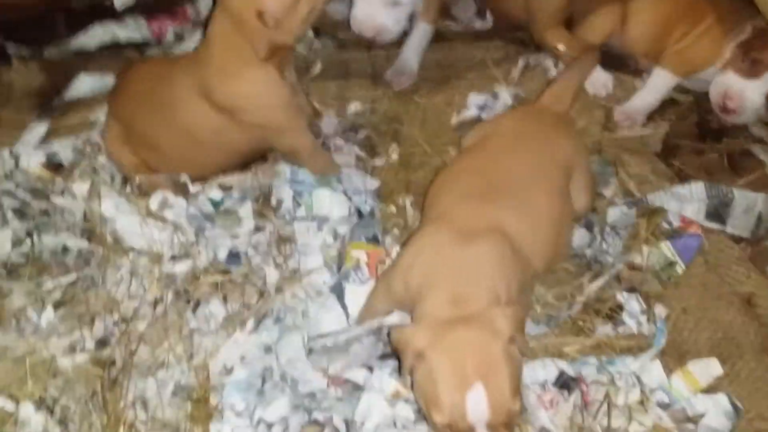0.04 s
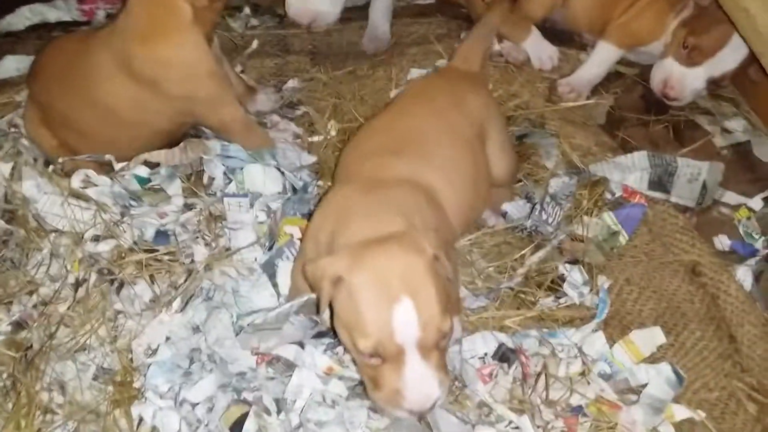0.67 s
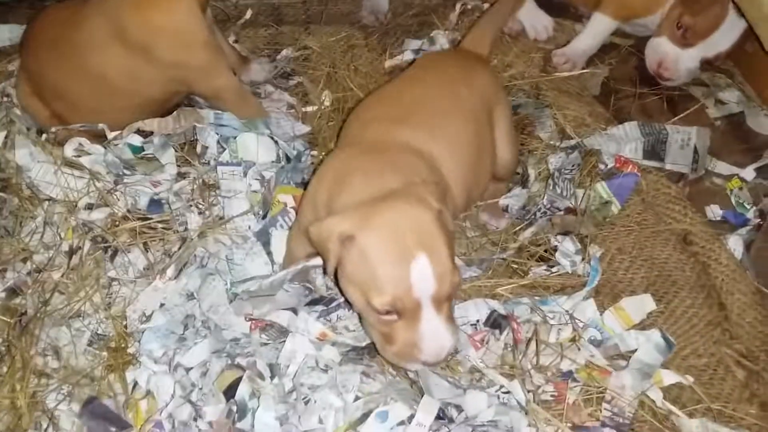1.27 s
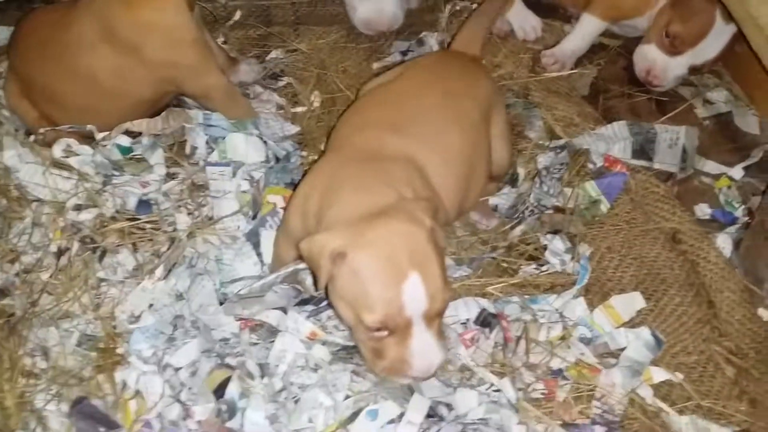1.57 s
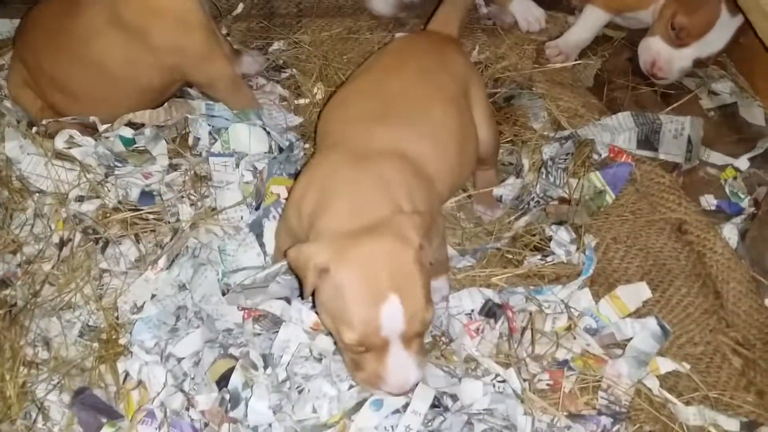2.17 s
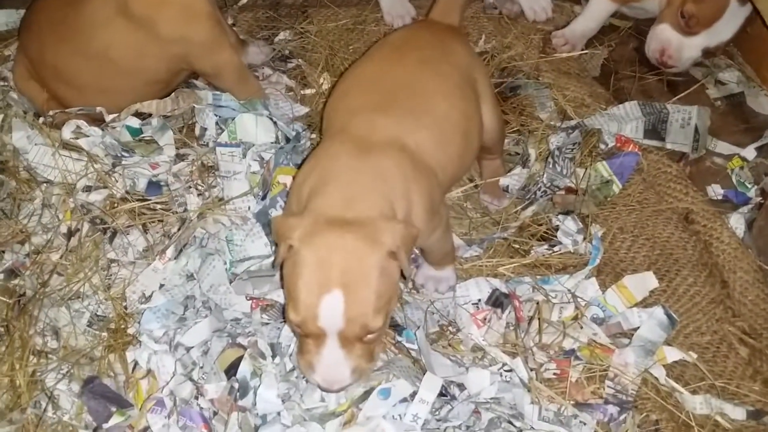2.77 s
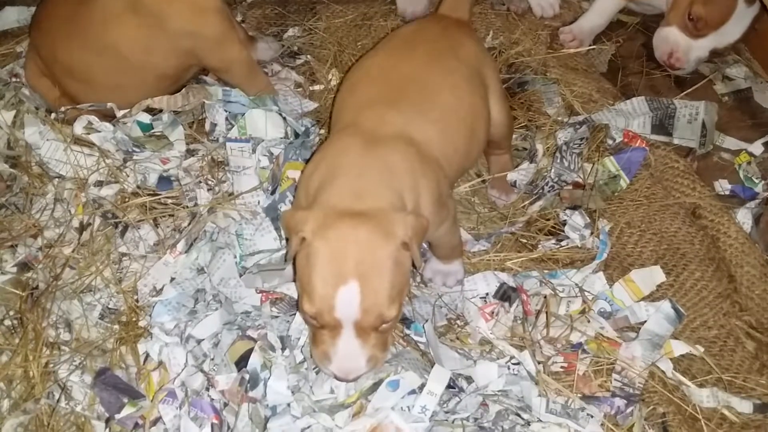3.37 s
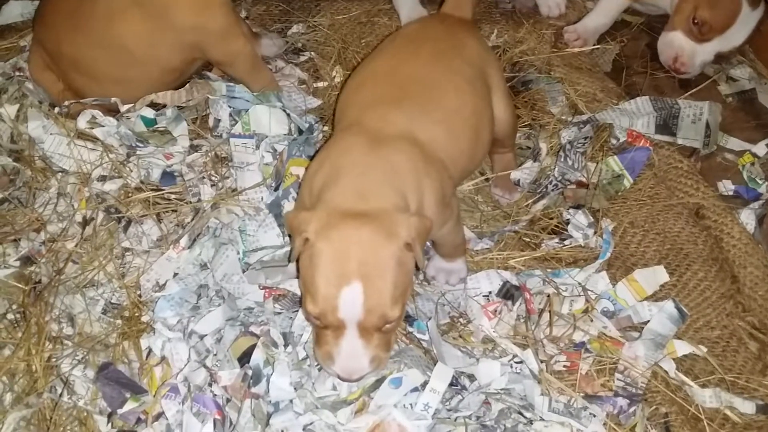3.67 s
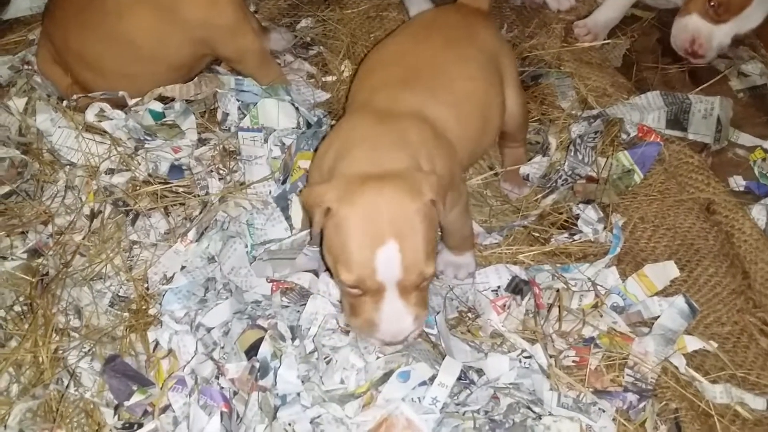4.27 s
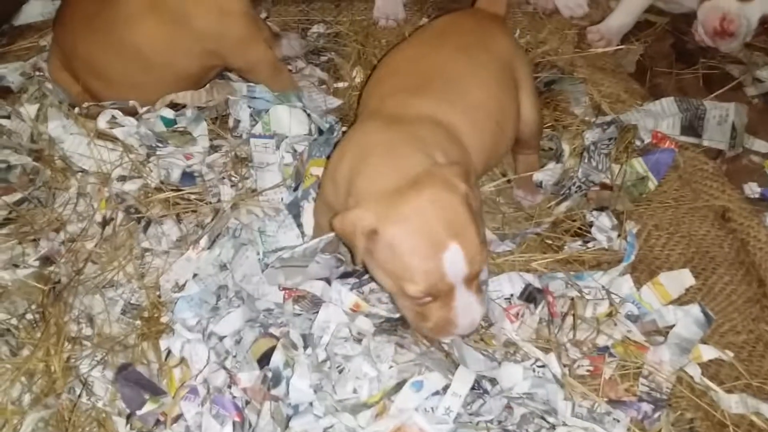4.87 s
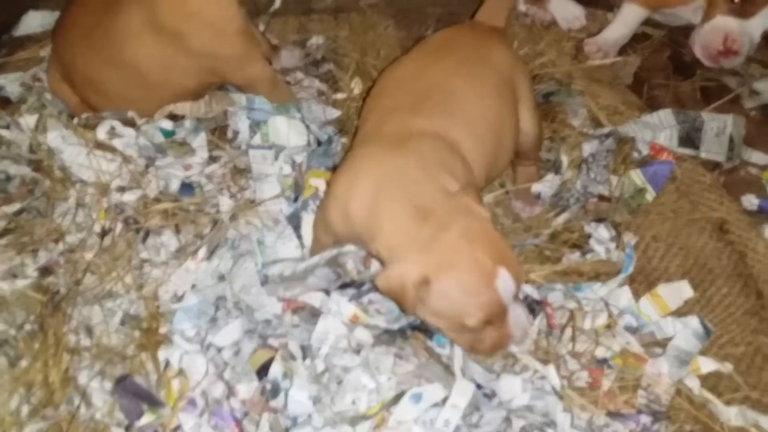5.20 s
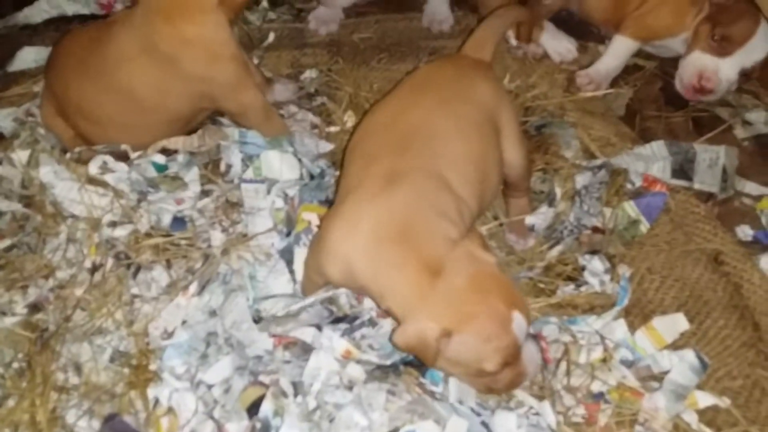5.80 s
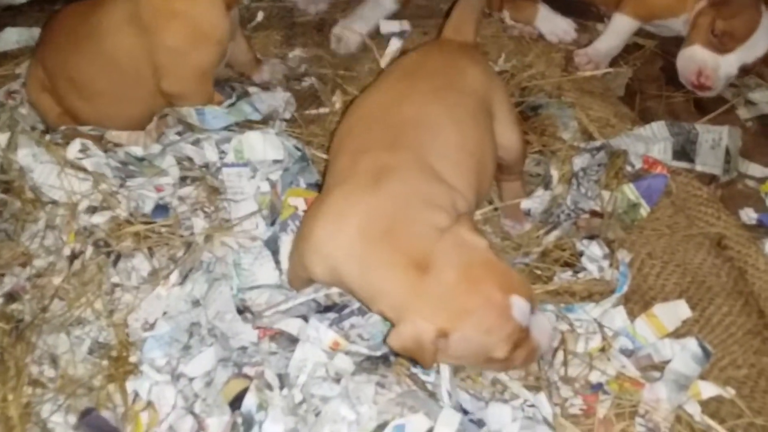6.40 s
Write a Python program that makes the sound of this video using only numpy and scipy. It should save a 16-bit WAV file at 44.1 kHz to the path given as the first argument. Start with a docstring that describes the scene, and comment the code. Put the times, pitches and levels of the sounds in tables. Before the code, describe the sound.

For the first second, shredded paper and straw rustle and snap while paws bump softly on the floor, with a low handling rumble on the close microphone. After a lull, a young puppy starts whining at about 2.3 seconds. Its short, thin cries come two or three a second, mostly rising and then sliding down, and the wooden pen rings briefly after them. They are strongest between about 2.6 and 4.7 seconds, some cracking into a rasp, and end in a lower, weaker whimper at 5 seconds. The right channel pops faintly near 3.9 seconds and sharply at 5. From 5.6 seconds the paws and bedding stir again, and three more cries follow near 5.9, 6.2 and 6.6 seconds, the middle one dropping into a tiny growl. Faint, distant crickets chirp over steady room tone throughout.

```python
"""Puppy whining in a pen

A young puppy whines in a wooden pen bedded with shredded paper and straw, close to a hand-held camera.
Its vocal folds ring the throat and muzzle in thin cries that mostly rise and slide down, cracking here
and there; the pen rings briefly after them. Paws bump and rustle in the bedding, the hand rumbles on
the camera, crickets chirp far off over the room tone, and the right channel pops twice."""
import sys
import numpy as np
from scipy import signal
from scipy.fft import rfft, irfft, next_fast_len
from scipy.io import wavfile
from scipy.ndimage import uniform_filter1d

SR = 44100
rng = np.random.default_rng(int(sys.argv[2]) if len(sys.argv) > 2 else 0)


def store_pcm(level_fs):
    """Save levels as 16-bit WAV."""
    pcm = np.round(np.clip(level_fs, -1, 1) * 32767).astype(np.int16)
    wavfile.write(sys.argv[1], SR, np.atleast_2d(pcm).T)


N = 293265
TIME = np.arange(N) / SR
TOP_HZ = 14800

# room tone EQ at each microphone: (frequency [Hz], gain [dB])
ROOM_EQ_LEFT = [(25, -7), (90, -4), (250, -4.5), (450, -12.5), (900, -0.5), (2000, -11), (4000, -16.5),
                (5800, -24.5), (7300, -3.5), (8500, -23), (10500, -12), (12000, -27), (14500, -26.5)]
ROOM_EQ_RIGHT = [(25, -17.5), (90, -5), (250, -11.5), (450, -13.5), (1200, -5.5), (2700, -13), (4200, -24),
                 (6200, -35), (7500, -28), (9000, -17.5), (10600, -14.5), (12000, -35), (14500, -33)]
# swells of shifting bedding: (peak time [s], relative level [dB], rise [s], fall [s])
RUSTLES = [(0, -44, .02, 0.062), (.17, -51.5, 0.091, 0.25), (.43, -43.5, 0.12, 0.19),
           (.92, -53.5, 0.22, 0.13), (6.04, -48, 0.13, 0.059), (6.35, -52, 0.36, 0.14),
           (6.65, -41, 0.055, .05)]
# tone of rubbing paper: (frequency [Hz], gain [dB])
PAPER_EQ = [(240, -13), (400, -4.5), (542, -4), (854, 1), (1470, -2), (2030, 1), (4810, -9.5), (8960, 1),
            (13900, -11), (15000, -21)]
# straw and paper snapping: (time [s], relative level [dB], centre [Hz])
STRAW_SNAPS = [(.021, -40, 2500), (.103, -28.5, 9000), (0.154, -29, 9000), (0.177, -29, 9000),
               (.21, -32, 6360), (0.259, -31, 9000), (.339, -27.5, 8000), (0.497, -41, 3500),
               (.637, -33, 2594), (0.656, -28, 7660), (0.982, -33, 870), (2.441, -35, 7100),
               (2.548, -40, 6000), (5.602, -39, 8000), (5.669, -36, 3950), (5.742, -32.5, 8040)]
# swells of hand rumble: (peak time [s], relative level [dB], rise [s], fall [s])
HAND_SWELLS = [(.15, -52, 0.21, 0.52), (1.02, -53.5, 0.25, 0.041), (3.6, -58, 1.3, 1.5),
               (6.6, -58.5, 0.67, .3)]
# paws hitting the floor: (time [s], relative level [dB], ring [Hz], decay [s])
PAW_BUMPS = [(.005, -45.5, 221, 0.018), (0.194, -34.5, 256, 0.019), (0.229, -44, 248, 0.076),
             (0.314, -41, 278, 0.047), (.545, -46.5, 236, 0.083), (0.814, -39.5, 220, 0.033),
             (0.839, -40.5, 221, 0.036), (.98, -38, 126, 0.04), (1.021, -39, 128, 0.016),
             (2.03, -52.5, 242, 0.042), (2.249, -46.5, 212, 0.016), (3.55, -46.5, 228, 0.041),
             (5.61, -50, 323, 0.061), (5.716, -49, 304, 0.017), (5.887, -44, 202, 0.017),
             (6.405, -45.5, 258, 0.039)]
# distant crickets: (pitch [Hz], bandwidth [Hz], chirp rate [1/s], centre of one chirp [s],
# duty cycle [0-1], left level [dB], right level [dB])
CRICKET_SONGS = [(5050, 980, 4.53, 1.17, 0.74, -63.5, -69), (8840, 430, 6.1, 0.49, 0.81, -66, -62.5)]
# pitch curve of each cry, one list per cry: (time [s], pitch [Hz])
CRY_GLIDES = [
    [(2.315, 1553), (2.32, 1500), (2.334, 1146), (2.342, 942), (2.347, 783), (2.362, 804)],
    [(2.57, 1450), (2.586, 1580), (2.598, 1654), (2.616, 1633), (2.641, 1543), (2.661, 1453), (2.688, 1183),
     (2.703, 915), (2.728, 733)],
    [(2.893, 1280), (2.902, 1192), (2.931, 1501), (2.962, 1524), (2.997, 1378), (3.012, 1298),
     (3.049, 1150), (3.07, 861), (3.096, 562)],
    [(3.262, 1272), (3.273, 1118), (3.303, 1527), (3.331, 1634), (3.358, 1472), (3.363, 1364),
     (3.393, 1333), (3.412, 1276), (3.441, 804), (3.452, 656)],
    [(3.613, 908), (3.642, 1193), (3.665, 1494), (3.705, 1518), (3.712, 1362), (3.74, 1183), (3.805, 1065),
     (3.828, 1002), (3.864, 725), (3.876, 542)],
    [(4.033, 815), (4.069, 1147), (4.089, 1509), (4.125, 1607), (4.157, 1297), (4.171, 1348), (4.253, 1258),
     (4.269, 909), (4.274, 885), (4.295, 785)],
    [(4.482, 806), (4.5, 889), (4.521, 1122), (4.551, 1187), (4.559, 1196), (4.612, 906.5), (4.666, 797),
     (4.675, 752), (4.723, 737.4), (4.798, 626)],
    [(4.997, 756), (5.018, 819), (5.033, 742.4), (5.059, 855), (5.08, 843), (5.126, 709), (5.154, 558),
     (5.186, 473), (5.203, 554)],
    [(5.84, 1350), (5.844, 1130), (5.868, 1220), (5.889, 1500), (5.894, 1190), (5.925, 992)],
    [(6.135, 1533), (6.153, 1585), (6.177, 1536), (6.182, 1292), (6.219, 1171), (6.261, 900.5),
     (6.301, 980), (6.319, 882), (6.323, 564), (6.34, 640)],
    [(6.525, 1444), (6.542, 1571), (6.57, 1616), (6.597, 1540), (6.601, 1483), (6.632, 1406), (6.649, 1070),
     (6.7, 750)],
]
# voicing of the same cries: (relative level [dB], swell [s], fade [s], shrill overtone gain [dB],
# fundamental gain [dB], throat resonance scale [ratio])
CRY_VOICINGS = [ (-28.5, 0.0073, 0.022, 11.5, 4.5, 0.94), (-21.5, 0.053, 0.056, 4, 8.5, 0.987),
                (-23, 0.098, 0.031, 2.5, 4.5, 1.01), (-23.5, 0.12, 0.047, 1.5, 0.5, 1),
                (-22.5, 0.087, 0.025, 2.5, 1.5, 1.01), (-18.5, 0.076, 0.029, -2.5, 0, 1.022),
                (-21.5, 0.039, 0.044, 1.5, -2, 1), (-31, 0.012, 0.015, 4, 4, 1.005),
                (-36, 0.016, 0.036, -2.5, 2.5, 1.044), (-29.5, 0.027, 0.011, 1, .5, 1.11),
                (-27.5, 0.04, 0.011, 7.5, 8.5, 1.09)]
# a slow second vibration in the throat turns one cry into a growl: (time [s], pitch [Hz])
GROWL_PITCH = [(6.245, 313.4), (6.266, 307.7), (6.305, 238), (6.344, 210)]
# voicing of the growl: one row, columns as in CRY_VOICINGS
GROWL_VOICING = (-34, -4, -1.3, -21.5, -1, 0.74)
# broad resonances of throat and muzzle: (frequency [Hz], gain [dB])
THROAT_EQ = [(300, 3.5), (450, 2.5), (700, 1.5), (1000, 10.5), (1350, 16.5), (1850, 18), (2150, 13),
             (2500, 0), (3000, 6), (3600, -6), (4700, 0.5), (6100, -15.5), (8400, -1), (10000, -13),
             (11500, -41.5), (15000, -67)]
# narrow peaks and dips of the open mouth: (centre [Hz], gain [dB], half width [Hz])
MOUTH_EQ = [(766, -5.5, 64), (1095, -3.5, 66), (1380, 2.5, 200), (1787, 5, 110), (2020, 1, 140),
            (3360, -4.5, 500), (4500, -5.5, 170), (6000, -2, 300), (8400, 1, 380), (9100, -4.5, 630)]
# the body of the voice surges or catches: (time [s], gain [dB], half length [s])
VOICE_SURGES = [(2.318, 13, 0.0071), (2.348, 7, .004), (3.051, -5, 0.011), (3.71, 1.5, 0.027),
                (4.054, 5, .011), (4.11, -2, 0.039), (4.609, 3, 0.067), (5.082, 9.5, 0.01),
                (6.156, -2, .015), (6.592, 10.5, 0.0076), (6.63, -11, 0.027)]
# voice cracks: (start [s], end [s], subharmonic period [fold cycles], depth [0-1], rasp [0-1])
VOICE_CRACKS = [ (3.678, 3.714, 3, 0.29, 0.21), (4.131, 4.166, 2.5, 0.52, 0.25),
                (4.208, 4.216, 2, 0.2, 0.16), (4.53, 4.585, 2, 0.11, 0.2), (4.571, 4.574, 2, 0.34, 0.63),
                (4.997, 5.032, 2, 0.25, 0.27), (6.212, 6.261, 3, 0.24, 0.13), (6.251, 6.334, 3, 0.4, 0.28)]
# the puppy turns its head toward the left microphone port: (time [s], gain [dB])
HEAD_TURN_GAIN = [(2.6, 2), (3.4, 0), (4.7, 1), (6.2, 4.5)]
# tone of the left port against the right: (frequency [Hz], gain [dB])
LEFT_PORT_EQ = [(300, 2.5), (700, -10), (1300, -9), (2100, -13), (3700, -12.5), (4500, -7.5), (5500, 2),
                (7000, 3), (8000, -6.5), (8800, -16.5), (10000, -15), (12000, -13)]
# tone of the pen's reflections: (frequency [Hz], gain [dB])
PEN_EQ = [(200, -54), (700, 22), (1200, -3.5), (1900, 1.5), (4000, 4.5), (8000, 7), (14000, 30)]
# air modes of the pen: (frequency [Hz], bandwidth [Hz], relative gain [dB])
PEN_AIR_MODES = [(536, 22, 5), (604, 36, -2), (656, 49, 12), (718, 15, 12.5), (752, 3, -50),
                 (790, 7.6, -50)]
# electrical pops in the right channel: (time [s], relative height [ratio])
INPUT_POPS = [(3.9414, 0.098), (5.041, 1.)]


def undb(db):
    """Decibels to gain."""
    return 10 ** (np.asarray(db) / 20)


def unit(x):
    """Scale to rms 1."""
    return x / np.sqrt(np.mean(x ** 2))


def eq(x, points):
    """Filter by (frequency [Hz], gain [dB]) points joined on a log-frequency axis."""
    hz, db = np.transpose(points)
    size = next_fast_len(x.shape[-1] + 2048)
    bins = np.maximum(np.arange(size // 2 + 1) * SR / size, 1)
    gain = undb(np.interp(np.log(bins), np.log(hz), db))
    return irfft(rfft(x, size) * gain, size)[..., :x.shape[-1]]


def resonate(x, hz, width_hz):
    """One resonance, gain 1 at its centre."""
    hz = min(hz, .45 * SR)
    return signal.lfilter(*signal.iirpeak(hz, hz / min(width_hz, SR / 4), fs=SR), x)


def band(x, hz, width_hz):
    """The same resonance twice, for steeper skirts."""
    return resonate(resonate(x, hz, width_hz), hz, width_hz)


def wobble(rate, count=N):
    """Random modulator of rms 1 that heads for a new value rate times a second."""
    steps = np.arange(count) / SR * rate
    return unit(np.interp(steps, np.arange(count), rng.standard_normal(count)))


def level_out(x, window_s=0.0063):
    """Even out the loudness of a tone, keeping its waveform."""
    size = int(window_s * SR)
    return x / np.sqrt(uniform_filter1d(uniform_filter1d(x ** 2, size), size) + 1e-12)


def swells(rows):
    """Envelope of bell-shaped swells that add in power."""
    return np.sqrt(sum(undb(2 * db) * np.exp(-2 * ((TIME - s) / np.where(TIME < s, rise_s, fall_s)) ** 2)
                       for s, db, rise_s, fall_s in rows))


def bells(x, rows):
    """Sum of bell curves over x, each given as (centre, height, half width)."""
    return sum(height * np.exp(-((x - centre) / width) ** 2) for centre, height, width in rows)


def room_tone(left_db=-55, right_db=-52.5, waver_db=.7):
    """Room rumble shared by both microphones, and hiss coloured by each port."""
    rumble = eq(rng.standard_normal(N), [(60, 16.5), (400, 4.5), (1500, -22), (5000, -17)])
    air = eq(rng.standard_normal((2, N)) + rumble, [(60, -9.5), (400, 1.5), (1500, -5.64), (5000, 2.5)])
    left = undb(left_db) * unit(eq(air[0], ROOM_EQ_LEFT))
    right = undb(right_db) * unit(eq(air[1], ROOM_EQ_RIGHT))
    return np.array([left, right]) * undb(waver_db * wobble(10))


def bedding(grain_db=2.5, snap_cycles=10, snap_trim_db=-6, left_db=-3, right_db=3):
    """Paper strips rub in a dense hiss of tiny grains; single straws snap, the low ones lasting longest."""
    grains = rng.standard_normal((2, N)) * undb(grain_db * wobble(2500))
    out = unit(eq(grains, PAPER_EQ)) * swells(RUSTLES)
    t = TIME[:SR // 20]
    for s, db, hz in STRAW_SNAPS:
        start = int(s * SR)
        snap = unit(band(rng.standard_normal((2, len(t))), hz, width_hz=1.74 * hz))
        out[:, start:start + len(t)] += undb(db + snap_trim_db) * snap * np.exp(-t * hz / snap_cycles)
    return out * undb([[left_db], [right_db]])


def handling(uneven_db=5, left_db=-3, right_db=1):
    """The hand sends a dull, uneven rumble through the camera body."""
    shake = rng.standard_normal(N) + .5 * rng.standard_normal((2, N))
    rumble = unit(eq(shake, [(20, -24), (50, -3), (100, -4), (170, -13.5), (400, -17), (1500, -36)]))
    return rumble * swells(HAND_SWELLS) * undb(uneven_db * wobble(25)) * undb([[left_db], [right_db]])


def paws(attack_s=0.0038, stereo_spread=0.27, left_db=-3, right_db=2):
    """Soft, scuffing blows on the floor; the bedding muffles all but the lowest ring."""
    out = np.zeros((2, N))
    for s, db, hz, decay_s in PAW_BUMPS:
        start = int(s * SR)
        t = TIME[:min(SR // 3, N - start)]
        scuff = rng.standard_normal(len(t)) + stereo_spread * rng.standard_normal((2, len(t)))
        thud = level_out(band(scuff, hz, width_hz=130), window_s=0.032)
        envelope = np.minimum(t / attack_s, 1) * np.exp(-t / decay_s)
        out[:, start:start + len(t)] += undb(db) * thud * envelope
    return eq(out, [(380, 0.5), (520, -3), (1000, -30)]) * undb([[left_db], [right_db]])


def crickets(drift_rad=0.29):
    """Regular chirps, smeared by distance into narrow bands of hiss."""
    out = np.zeros((2, N))
    for hz, width_hz, rate, centre_s, duty, left_db, right_db in CRICKET_SONGS:
        cycle = np.cos(2 * np.pi * rate * (TIME - centre_s) + drift_rad * wobble(2.08))
        gate = np.clip(.5 + 1.6 * (cycle - np.cos(np.pi * duty)), 0, 1)
        trill = unit(band(rng.standard_normal((2, N)), hz, width_hz))
        out += undb([[left_db], [right_db]]) * gate * trill
    return out


def effort(t, swell_s, fade_s, swell_db, fade_db=15.5, tremble_db=1.16, onset_s=0.0048, stop_s=0.0025):
    """Envelope of one cry: it swells to full effort, holds with a slight tremble and sinks."""
    elapsed, remaining = t - t[0], t[-1] - t
    swell = -swell_db * np.maximum(1 - elapsed / swell_s, 0) ** 2
    fade = -fade_db * np.maximum(1 - remaining / fade_s, 0) ** 2
    gate = np.minimum(np.minimum(elapsed / onset_s, remaining / stop_s), 1)
    return undb(swell + fade + tremble_db * wobble(85, len(t))) * gate


def vocal_folds(phase, glide_hz, jittered_hz, nasal, closing, nasal_db=-9, falsetto_db=-4.5):
    """The folds pulse out harmonics, each flaring as it slides through a resonance of the mouth."""
    falsetto = np.clip((glide_hz - 1260) / 204, 0, 1)  # high notes thin out the second harmonic
    boost_db, muffle_db = 8 * closing, -10 * closing  # a closing mouth favours the fundamental
    tone = undb(nasal_db * nasal + boost_db + bells(glide_hz, MOUTH_EQ)) * np.cos(phase)
    overtones = np.zeros(len(phase))
    for k in range(2, 26):
        hz = k * jittered_hz
        flutter_db = 6.5 * np.clip(hz / 2000 - 1, 0, 1) * wobble(70, len(phase))  # shrill ones only
        db = flutter_db + bells(k * glide_hz, MOUTH_EQ) + muffle_db + falsetto_db * falsetto * (k == 2)
        overtones += undb(db) * np.cos(k * phase) * (hz < TOP_HZ)
    return tone, overtones


def breath(phase, rasp):
    """Air hisses through once a cycle while the folds are open, harder when the voice rasps."""
    turbulence = eq(rng.standard_normal(len(phase)), [(500, 2.5), (1700, 5), (4000, 12.5), (8000, 21.5)])
    return (0.081 + 0.77 * rasp) * (1 + np.cos(phase)) * turbulence


def cry(glide, level_db, swell_s, fade_s, shrill_db, fundamental_db, throat_scale,
        edge_s=.003, nasal_s=.05, nasal_below_hz=1080, hoarse_s=.04, close_s=0.023):
    """Folds and breath sound through the throat; in a crack a slower vibration joins and the air rasps."""
    times, pitches = np.transpose(glide)
    span = (TIME > times[0] - edge_s) & (TIME < times[-1] + edge_s)
    t = TIME[span]
    remaining = times[-1] + edge_s - t
    nasal = np.clip(1 - (t - times[0]) / nasal_s, 0, 1) * (pitches[0] < nasal_below_hz)
    closing = np.clip(2 * (1 - remaining / close_s), 0, 1)
    cracks = [(np.clip(np.minimum(t - start, end - t) / edge_s + .5, 0, 1), period, depth, amount)
              for start, end, period, depth, amount in VOICE_CRACKS]
    rasp = sum(gate * amount for gate, _, _, amount in cracks)
    rasp += 0.26 * np.clip((hoarse_s - remaining) / edge_s, 0, 1)  # hoarse as the effort gives out

    glide_hz = np.interp(t, times, pitches)
    jittered_hz = glide_hz * (1 + (.008 + 0.055 * rasp) * wobble(700, len(t)))
    phase = 2 * np.pi * np.cumsum(jittered_hz) / SR
    fundamental, overtones = vocal_folds(phase, glide_hz, jittered_hz, nasal, closing)
    folds = undb(fundamental_db) * fundamental + overtones
    subharmonic = sum(gate * depth * np.cos(phase / period) for gate, period, depth, _ in cracks)
    voice = eq(folds * (1 + subharmonic) + breath(phase, rasp), np.array(THROAT_EQ) * [throat_scale, 1])

    # split the bands so the shrill top opens up in its own time
    body = signal.sosfiltfilt(signal.butter(6, 3500, fs=SR, output="sos"), voice)
    shrill = undb(shrill_db) * level_out(voice - body) * effort(t, 0.096, fade_s, swell_db=14)
    body = body * undb(bells(t, VOICE_SURGES)) * effort(t, swell_s, fade_s, swell_db=17)
    out = np.zeros(N)
    out[span] = undb(level_db) * unit(body + shrill)
    return out


def pen(x, early_db=-16, early_s=0.021, tail_db=-21, t60_s=0.38, ring_db=-2):
    """Near boards answer at once, the shed a little longer, and the air in the pen rings low."""
    t = np.arange(SR // 2) / SR
    early, tail = rng.standard_normal((2, 2, len(t))) * (t > .002)
    early = undb(early_db) * unit(early * np.exp(-t / early_s))
    tail = undb(tail_db) * unit(tail * np.exp(-np.log(1000) * t / t60_s))
    response = (early + tail) / np.sqrt(len(t))
    echoes = eq(signal.fftconvolve(x[None], response, axes=1)[:, :N], PEN_EQ)
    ring = sum(undb(db + ring_db) * resonate(x, hz, width_hz) for hz, width_hz, db in PEN_AIR_MODES)
    return echoes + ring


def puppy(direct_db=-1, left_echo_db=5, left_lead_samples=6):
    """The cries reach the left port first, but its opening faces away and hears more of the pen."""
    whines = sum(cry(glide, *voicing) for glide, voicing in zip(CRY_GLIDES, CRY_VOICINGS))
    voice = whines + cry(GROWL_PITCH, *GROWL_VOICING)
    echo_left, echo_right = pen(voice)
    direct = undb(direct_db) * voice
    turned = direct * undb(np.interp(TIME, *np.transpose(HEAD_TURN_GAIN)))
    left = eq(np.roll(turned, -left_lead_samples) + undb(left_echo_db) * echo_left, LEFT_PORT_EQ)
    return np.array([left, direct + echo_right])


def pops(swing_hz=82, attack_s=.0001, decay_s=0.0023, phase_rad=0.84, gain=1.65):
    """A sudden voltage step swings back to rest through the right input's bass cut."""
    out = np.zeros((2, N))
    for s, height in INPUT_POPS:
        t = np.maximum(TIME - s, 0)
        envelope = np.minimum(t / attack_s, 1) * np.exp(-t / decay_s)
        out[1] += gain * height * envelope * np.cos(2 * np.pi * swing_hz * t + phase_rad)
    return out


def scene():
    """Stereo mix of everything in and around the pen."""
    return puppy() + paws() + bedding() + crickets() + handling() + pops() + room_tone()


def record(dry):
    """The camera cuts the top with a steep low-pass."""
    return signal.sosfilt(signal.ellip(8, .2, 70, TOP_HZ, fs=SR, output="sos"), dry)


dry = scene()
out = record(dry)
store_pcm(out)
```